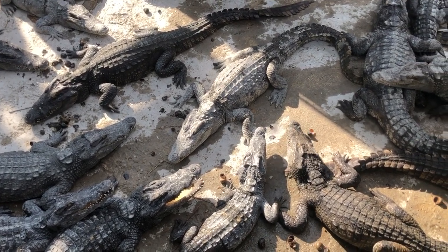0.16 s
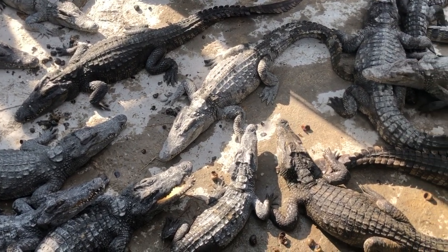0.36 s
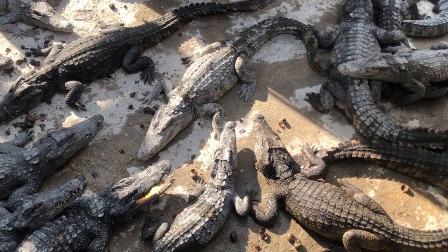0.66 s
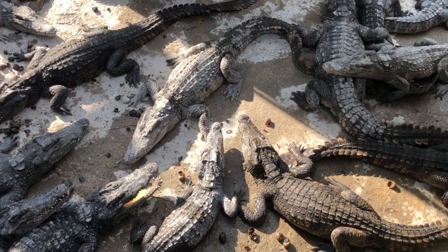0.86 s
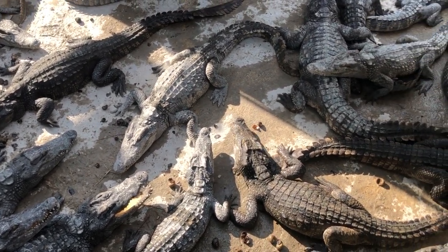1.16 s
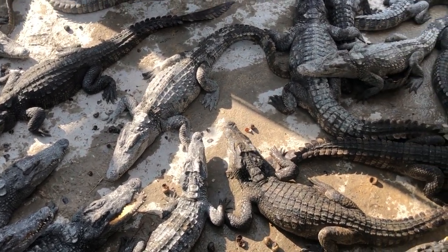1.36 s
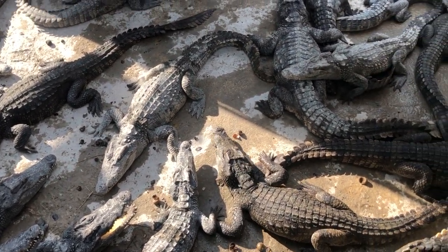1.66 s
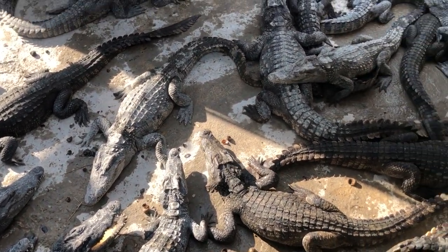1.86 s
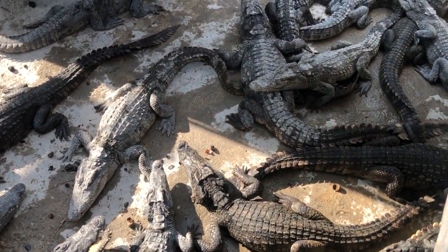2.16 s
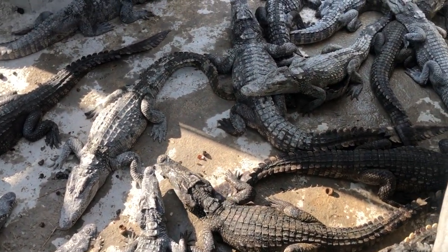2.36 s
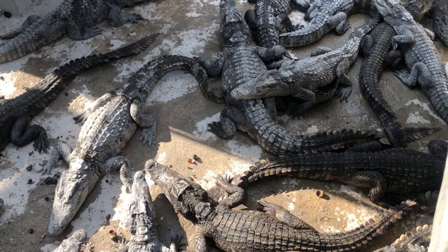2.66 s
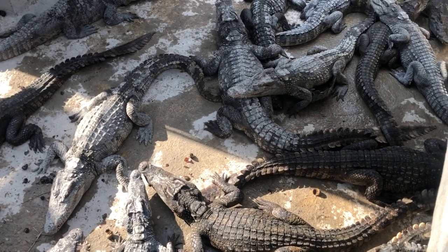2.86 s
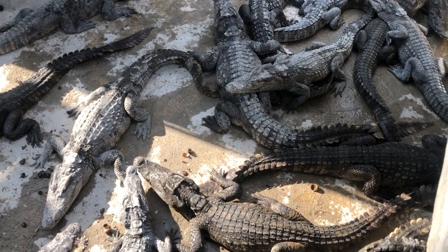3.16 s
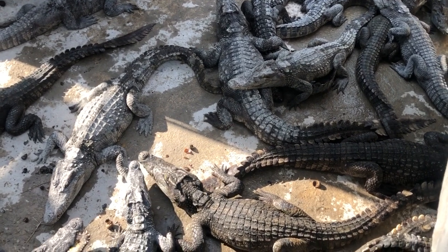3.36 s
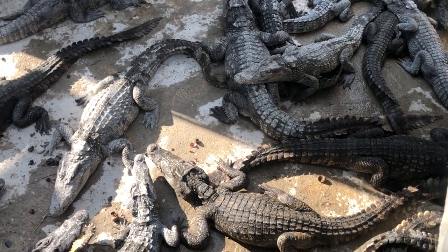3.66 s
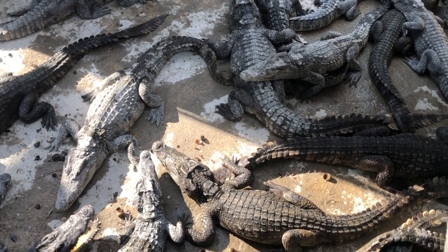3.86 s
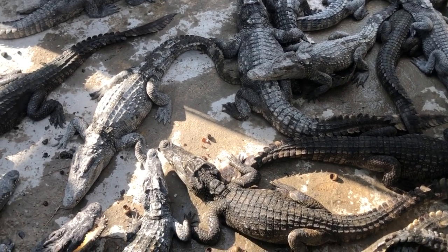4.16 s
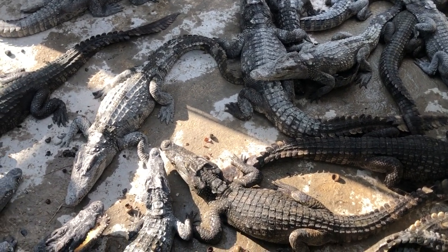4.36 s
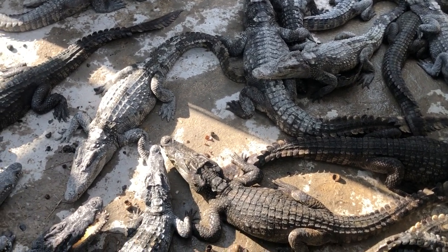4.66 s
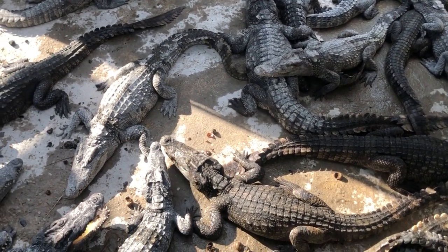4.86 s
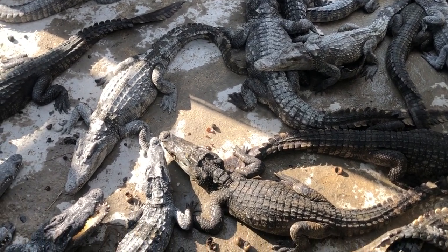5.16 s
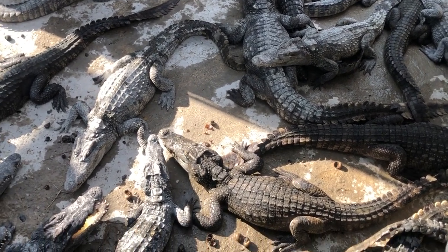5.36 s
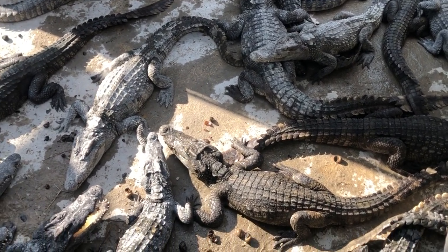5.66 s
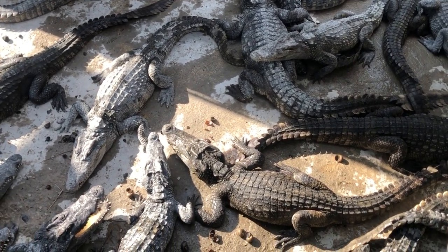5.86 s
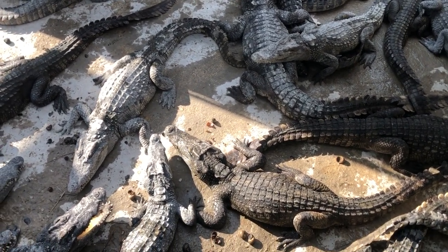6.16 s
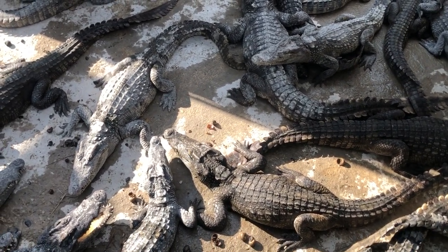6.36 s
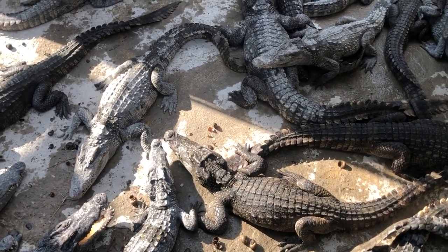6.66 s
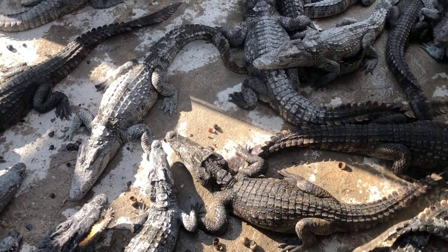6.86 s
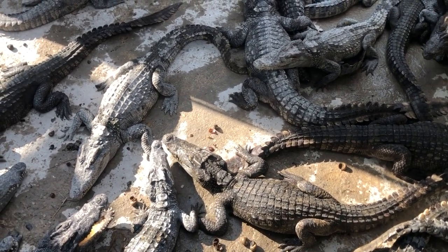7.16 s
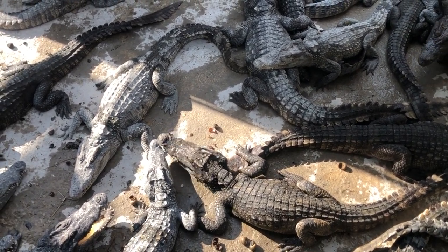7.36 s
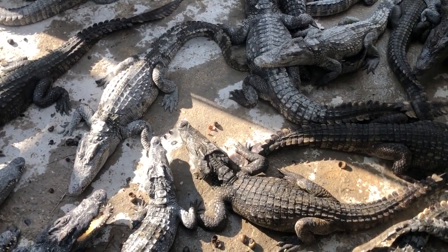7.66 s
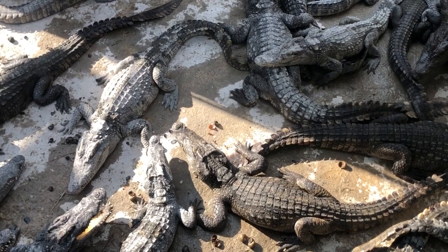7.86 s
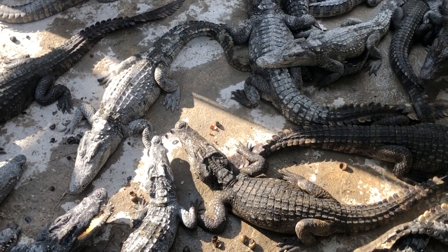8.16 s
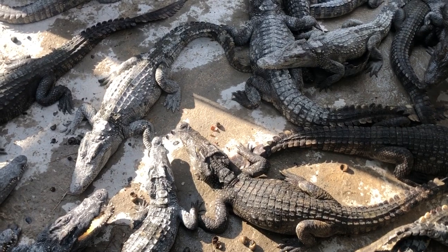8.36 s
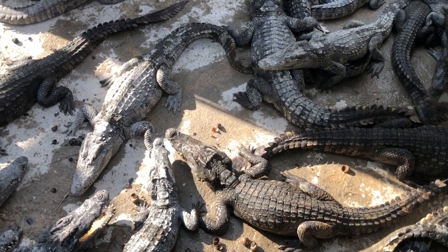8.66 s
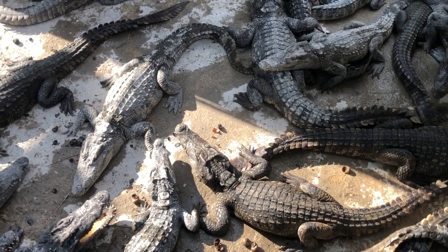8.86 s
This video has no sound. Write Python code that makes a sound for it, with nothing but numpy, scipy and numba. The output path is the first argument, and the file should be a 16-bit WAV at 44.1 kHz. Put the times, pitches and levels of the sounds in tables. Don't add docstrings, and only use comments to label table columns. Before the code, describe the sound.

Crocodiles in a concrete pen crack snail shells in sharp brittle bursts, with one loud hollow jaw knock and faint scraping between.

```python
import sys
import numpy as np
from scipy import signal
from scipy.fft import rfft, irfft
from scipy.io import wavfile
from scipy.ndimage import uniform_filter1d
from numba import njit

SR = 44100
rng = np.random.default_rng(int(sys.argv[2]) if len(sys.argv) > 2 else 0)


def voltage_ratio(decibels):
    exponent = np.asarray(decibels, float) / 20
    return 10 ** exponent


def output_pcm(signal):
    pcm = np.clip(np.atleast_2d(signal).T, -1, 1) * 32767
    wavfile.write(sys.argv[1], SR, np.round(pcm).astype(np.int16))


N = 397341
TIME = np.arange(N) / SR
NEAR_WALL_DB = -18.5

# time in seconds, level in dB, shell resonance in Hz,
# treble in dB, treble resonance in Hz.
GRIND_STROKES = [
    [(0.42, -70, 2330, -7, 10600), (0.55, -66, 2610, -11, 9530), (0.648, -76, 2560, -17, 8800),
     (0.7, -55, 2390, 1, 10400)],
    [(1.47, -50, 3000, -0.5, 12900), (1.5, -56, 3000, -4, 12000), (1.512, -48, 3300, -12, 12000),
     (1.54, -52, 3000, -8, 12000), (1.57, -48, 2970, -12, 11300), (1.63, -57, 2800, -6, 13500),
     (1.69, -60, 2950, 11, 14100), (1.715, -62, 2800, 0, 14300), (1.9, -71, 1790, -14, 9900)],
    [(6.32, -76, 1820, -11, 8600), (6.36, -54.5, 1540, 0, 8300), (6.405, -52, 1580, 0, 8400),
     (6.425, -66, 1650, 2, 8300), (6.45, -55, 1650, 0, 8300), (6.58, -68, 2000, -3, 8500),
     (6.605, -48, 2150, -12, 8300), (6.73, -66, 2100, -10, 8300)],
]


def rms1(x):
    return x / np.sqrt(np.mean(x ** 2) + 1e-30)


def colour(x, points):
    hz, db = np.transpose(points)
    log_hz = np.log(np.fft.rfftfreq(len(x), 1 / SR) + 1)
    gain_db = np.interp(log_hz, np.log(hz), db, db[0] - 29, db[-1])
    return irfft(rfft(x) * voltage_ratio(gain_db), len(x))


def ring(x, hz, width_hz):
    b, a = signal.iirpeak(min(hz, .45 * SR), hz / width_hz, fs=SR)
    return signal.lfilter(b, a, x)


def walk(rate):
    hold = int(SR / rate)
    steps = np.repeat(rng.standard_normal(N // hold + 1), hold)
    return 1.62 * uniform_filter1d(steps, hold)[:N]


def fractures(size, spread_db):
    impulses = rng.standard_normal(size)
    strength = np.minimum(rng.exponential(size=size), 4.5)
    return rms1(impulses * voltage_ratio(spread_db * strength))


def add(track, s, sound):
    i = int(s * SR)
    track[i:i + len(sound)] += sound[:max(N - i, 0)]


@njit
def glide(x, hz, share):
    y, band, low = np.empty(len(x)), 0., 0.
    for i in range(len(x)):
        g = np.tan(np.pi * hz[i] / SR)
        v = (band + g * (x[i] - low)) / (1 + g * (g + share))
        band, low, y[i] = 2 * v - band, low + 2 * g * v, share * v
    return y


def bites():
    direct, sent = np.zeros(N), np.zeros(N)
    t = np.arange(4096) / SR
    pulse = 1. * (np.arange(len(t)) == 128)
    for s, db, ms, hz, brittle_db, wall_db in breaks():
        length = max(ms - 1.6, .3) / 1000
        push = (1 - np.exp(-t / (0.18 * length))) * np.exp(-.7 * (t / length) ** (1.17 + ms / 16))
        push += voltage_ratio(-15) * (1 - np.exp(-t / length)) * np.exp(-t / 0.015)
        clumps = rng.standard_normal(64) + .8 * (np.arange(64) == 0)
        clumps = uniform_filter1d(np.repeat(clumps, 64), size=32)
        cracks = fractures(len(t), spread_db=4.0 / (1 + ms / 8)) * voltage_ratio(5 * clumps / (1 + ms / 10))
        shell = [(700, -27), (1100, -4.5), (2800, -1.5), (9000, brittle_db), (16000, brittle_db - 2.0)]
        scale = voltage_ratio(1.5) / np.std(colour(cracks, shell))
        width_hz = 0.15 * hz * (1 + ms / 40)
        chip_db = -3.0 + 0.67 * np.log2(hz / 3000) - 0.16 * ms + 0.13 * (wall_db - NEAR_WALL_DB)
        chip = voltage_ratio(chip_db) * np.sqrt(SR / np.pi / width_hz)
        energy = np.linalg.norm(push)
        cracks *= energy / np.linalg.norm(cracks * push)
        bare = colour(cracks * push, shell)
        bare *= energy / np.linalg.norm(bare)
        ringing = chip * ring(cracks * push, hz, width_hz)
        bite = held_shell(bare, s) + ringing
        add(direct, s, voltage_ratio(db) * bite)
        bite = bite - 0.31 * ringing
        if ms < 12:
            snap = scale * held_shell(colour(pulse, shell), s)
            bite = energy * (snap + voltage_ratio(-6) * chip * ring(pulse, hz, width_hz))
        add(sent, s, voltage_ratio(db + wall_db) * bite)
    return direct, sent


def breaks():
    # start in seconds, level in dB,
    # shell resonance in Hz, brittleness (treble minus low) in dB.
    gnaws = [(1.551, -35, 2960, -2), (1.6295, -38, 2920, 2), (1.7091, -41, 14000, -1),
             (1.729, -32, 14850, -9), (1.7475, -32.5, 3670, 0), (1.762, -34, 12970, -15),
             (1.772, -36, 4220, -2), (1.786, -40, 5470, -6), (1.795, -52, 4000, -10),
             (1.8015, -42, 1730, -24), (1.8195, -44, 4000, -20), (1.8282, -33.5, 1750, -8),
             (1.874, -46, 10500, 10), (1.8937, -52, 2120, -6), (1.9017, -44, 2620, -7),
             (1.93, -31, 14500, 12), (6.2967, -61, 4500, -10), (6.3401, -47, 2380, -11),
             (6.4922, -36, 1100, -5), (6.5162, -37, 8550, 3), (6.5342, -39, 8370, -4),
             (6.5417, -32, 8600, -14), (6.5499, -33, 8450, 2), (6.557, -38, 8700, -7),
             (6.5898, -33, 8600, -8), (6.725, -51.5, 8550, 3)]
    # start in seconds, level in dB, shell resonance in Hz,
    # brittleness in dB.
    near_cracks = [(0.0504, -43, 15410, 15), (0.1122, -53, 3010, -26), (0.201, -55, 5060, -4),
                   (0.3966, -52, 3400, -18), (1.3474, -53, 4010, -19), (2.0699, -50, 4700, -17),
                   (2.0812, -35, 1460, -14), (2.1165, -45, 13400, 18), (2.325, -36.5, 2300, -3),
                   (2.3804, -39.5, 2800, 0), (2.5265, -37.5, 12220, 5), (3.4487, -57, 12960, 12),
                   (3.4724, -47, 1130, -2), (3.521, -38, 5270, -3), (3.6607, -48, 7550, -5),
                   (3.699, -44, 1240, 6), (3.8608, -35.5, 4600, -3), (4.1035, -47, 2980, -23),
                   (4.183, -47.5, 4300, -22), (4.2154, -51, 2920, -20), (4.2724, -40.5, 5300, -10),
                   (4.3047, -47, 14400, -12), (4.3127, -42, 11100, 13), (8.2885, -49, 4970, -16),
                   (8.9703, -47, 5350, 8)]
    # [s, dB, Hz, dB].
    far_cracks = [(0.1212, -47.5, 5210, -9), (0.1502, -49.5, 4860, -9), (0.2225, -54.5, 5670, 10),
                  (1.3546, -45.5, 3930, -12), (2.2845, -44, 11900, -14), (2.5856, -45, 1900, -6),
                  (2.5904, -43.5, 2220, -2), (2.669, -48, 5740, -11), (4.5671, -49, 2380, -7),
                  (5.135, -47, 11500, 5), (6.0946, -52, 6400, -8), (6.2162, -54.5, 3910, -8),
                  (8.363, -48, 2090, -22), (8.578, -49, 4600, -10)]
    # start in seconds, level in dB, length in ms,
    # resonance in Hz, brittleness in dB.
    snaps = [(1.229, -53.5, 27, 7300, 0), (1.467, -36.5, 12, 12500, -1), (1.572, -38.5, 8.6, 2940, 8),
             (1.643, -41.5, 11, 5500, -3), (1.667, -48, 30, 13900, 16), (1.693, -39, 6.6, 14300, -1),
             (1.912, -24, 4.7, 8100, -4.5), (1.921, -34.5, 6.7, 12100, 7), (3.5546, -45, 9.4, 5630, -9),
             (3.7131, -17, 4.8, 2200, -8), (3.722, -29, 7.5, 10300, -2), (6.3248, -51.5, 14, 1250, -7),
             (6.361, -45, 8.1, 1640, -5), (6.3788, -46, 13, 1470, -3), (6.4657, -42, 12, 8040, -4),
             (6.5004, -40, 9, 8500, -13), (6.5986, -20.5, 3.9, 7800, -9), (8.338, -52.5, 15, 4230, 1)]
    # [s, dB, ms, Hz, dB].
    crushes = [(0.011, -51, 11.5, 2590, -16), (1.139, -55, 35, 3000, -10), (1.507, -47, 15, 3600, 0),
               (2.3022, -45.5, 28, 3640, -6), (2.3207, -39, 8.5, 4760, -14), (3.1546, -40, 28, 5540, -3),
               (3.2812, -39.5, 26, 4550, 2.5), (3.5758, -49, 14, 5640, -5), (3.609, -51, 19, 8500, -13.5),
               (3.9031, -37, 17, 3100, -3), (4.855, -46.5, 33, 3730, 2.5), (5.111, -53, 24, 4650, -5),
               (5.1895, -28.5, 34, 5740, -11), (6.395, -46, 9.1, 8000, -1), (6.4373, -43.5, 11.5, 8200, -4),
               (7.4314, -59, 33, 14980, 9), (8.012, -50, 20, 2500, -11), (8.8755, -54, 18, 13910, -6)]
    # [s, dB, ms, Hz, dB].
    far_crushes = [(0.2964, -59.5, 14, 1170, -17), (0.429, -55, 13.3, 2330, -8),
                   (0.5279, -48, 12, 2700, -7), (0.706, -55, 16, 3020, -24), (0.7972, -48, 15, 4100, -8),
                   (.843, -49, 7.3, 4700, -15), (2.237, -57, 12, 6230, -12), (2.488, -52, 10, 960, -13),
                   (3.0797, -46, 13.7, 12800, -4.5), (4.692, -65.5, 58, 6940, -2),
                   (4.817, -59, 16, 13000, -2), (5.177, -43, 27, 8900, -11), (5.47, -65.5, 49, 14000, 7),
                   (7.2346, -63, 12, 970, 0), (7.5481, -61, 16, 895, 6), (7.73, -59.5, 19, 9700, 4),
                   (8.4616, -57, 11.4, 1560, -3), (8.4879, -51.5, 8.9, 1260, -6),
                   (8.625, -58, 7.4, 8950, -15)]
    mid_wall_db, far_wall_db, edge_wall_db = -11, -6.5, -3.5
    gnaw_ms, crack_ms, far_crack_ms = 2.83, 3.87, 3.07
    quick = [(gnaws, gnaw_ms, NEAR_WALL_DB), (near_cracks, crack_ms, NEAR_WALL_DB),
             (far_cracks, far_crack_ms, far_wall_db)]
    slow = [(snaps, NEAR_WALL_DB), (crushes, mid_wall_db), (far_crushes, edge_wall_db)]
    return ([(s, db, ms, hz, brittle, wall) for rows, ms, wall in quick for s, db, hz, brittle in rows]
            + [(*row, wall) for rows, wall in slow for row in rows])


def held_shell(x, s):
    # frequency in Hz, gain in dB.
    mouths = [
        [(1500, 2.5), (3000, 0), (4200, -0.5), (5800, 4.5), (8800, -5), (10500, -6), (14000, 3), (16000, 5)],
        [(1600, 3.5), (2400, 0), (4500, -2), (6000, 0), (7000, 2), (8500, 3), (10200, -7), (16000, -2)],
    ]
    for stroke, mouth in zip(GRIND_STROKES[1:], mouths):
        when, _, hz, _, treble_hz = np.transpose(stroke)
        if when[0] - .01 < s < when[-1] + .02:
            low, high = np.interp(s, when, hz), np.interp(s, when, treble_hz)
            x = colour(x, mouth)
            low_ring = voltage_ratio(-6.5) * ring(x, low, 0.17 * low)
            high_ring = voltage_ratio(-8.0) * ring(x, high, 0.095 * high)
            return voltage_ratio(-3.0) * x + low_ring + high_ring
    return x


def ticks():
    # peak
    # time in seconds, peak in dB, pitch in Hz.
    chip_ticks = [(1.4728, -28, 5800), (1.4756, -28, 14300), (1.4873, -35, 11500), (1.4925, -35, 11500),
                  (1.5246, -41, 3200), (1.5356, -41, 4400), (1.5551, -35, 3300), (1.5638, -43, 3600),
                  (1.5767, -28, 11000), (1.5882, -38, 3000), (1.6112, -39, 2500), (1.6506, -37, 4300),
                  (1.6546, -30, 14000), (1.676, -33, 13500), (1.6816, -35, 13900), (1.6975, -33, 13900),
                  (1.7024, -35, 14000), (1.7095, -25, 14000), (1.7134, -31, 13300), (1.7174, -39, 4100),
                  (1.7213, -36, 6000), (1.7404, -34, 5400), (1.7531, -39, 3900), (1.7631, -29, 4000),
                  (1.7955, -36, 4500), (1.803, -33.5, 1800), (1.823, -42, 2100), (1.8353, -38, 9000),
                  (1.8495, -36, 3700), (1.9194, -22, 12100), (1.9244, -27, 11500), (1.9414, -35, 8800),
                  (6.387, -44, 1700), (6.404, -41, 8400), (6.448, -39, 1800), (6.4552, -40, 8100),
                  (6.475, -37, 7400), (6.5039, -36, 8400), (6.5171, -30, 8800), (6.5255, -42, 8000),
                  (6.5507, -29, 8600), (6.5773, -43, 8900), (6.5862, -33, 8500), (6.5917, -28, 8500),
                  (6.6083, -22, 8000), (6.6295, -36, 5700), (6.654, -39, 7100),
                  (.8608, -43, 2000), (1.158, -47, 3700), (2.0703, -37, 3900), (2.1154, -26, 13400),
                 (2.239, -43, 3600), (2.2527, -45, 5400), (2.3345, -22, 11700), (2.3456, -44, 3100),
                 (2.4973, -51, 4900), (2.5273, -28, 11960), (2.6115, -41, 2300), (2.727, -43, 6000),
                 (3.0753, -41, 2000), (3.0979, -30, 10700), (3.1583, -29, 5620), (3.174, -33, 5200),
                 (3.2994, -28, 4600), (3.5238, -31.5, 5100), (3.5913, -37, 8600), (3.6203, -42, 6200),
                 (3.9373, -39, 5400), (3.9535, -41, 5100), (4.889, -42, 4200), (5.178, -42, 4600),
                 (5.198, -22, 3000), (5.2084, -24, 2600), (5.2185, -24, 2500), (5.2156, -20, 6700),
                 (5.2426, -25, 5000), (8.3452, -43, 10800), (8.8786, -46, 13600), (9.002, -43, 4000)]
    width, bare_db = .3, -7
    out = np.zeros(N)
    pulse = 1. * (np.arange(512) == 64)
    bare = colour(pulse, [(1200, 0), (16000, 0)])
    for s, db, hz in chip_ticks:
        body = ring(ring(pulse, hz, width * hz), hz, 2 * width * hz)
        body = body / np.abs(body).max() + voltage_ratio(bare_db) * bare
        peak_s = np.abs(body).argmax() / SR
        add(out, s - peak_s, voltage_ratio(db) * body / np.abs(body).max())
    return out


def grind():
    # time in seconds, level in dB,
    # lower band in Hz, upper level in dB, upper band in Hz.
    rasps = [
        [(7.72, -74, 2500, 5, 3150), (7.76, -55, 2450, 1, 3200), (7.85, -63, 2250, 1, 3200),
         (8.0, -76, 2310, 0, 3300)],
        [(8.0, -61, 2400, 1, 2580), (8.04, -55, 2120, -3, 2600), (8.09, -61, 2150, 3, 2700),
         (8.16, -61, 2250, 0, 2550), (8.24, -65, 2090, 0, 2600), (8.29, -64, 2060, 3, 2550)],
        [(0.428, -57, 2350, -8, 6200), (0.5, -66, 2500, -8, 6500)],
        [(0.528, -55, 2650, -10, 4000), (0.63, -66, 2700, -10, 4000)],
        [(0.798, -55, 4150, -6, 4500), (0.93, -68, 4200, -3, 4600)],
        [(3.899, -46, 1450, -10, 2800), (3.93, -53, 1500, -8, 2800), (4.1, -68, 1500, -8, 2700)],
        [(4.47, -68, 3000, -3, 3600), (4.56, -73, 3000, -3, 3600)],
        [(4.858, -58, 3400, -1, 4200), (4.96, -68, 3500, 0, 4200)],
    ]
    jerks = fractures(N, spread_db=3.0) * voltage_ratio(3.5 * walk(120))
    scales = fractures(N, spread_db=3.5) * voltage_ratio(1.2 * walk(50))
    return strokes(GRIND_STROKES, jerks, 0.32) + strokes(rasps, scales, 0.12)


def strokes(table, cracks, share):
    out = np.zeros(N)
    for stroke in table:
        s, *columns = np.transpose(stroke)
        span = slice(int(s[0] * SR), int(s[-1] * SR))
        db, low, upper_db, high = (np.interp(TIME[span], s, c) for c in columns)
        tone, upper = (rms1(glide(glide(cracks[span], c, 2 * share), c, share)) for c in (low, high))
        add(out, s[0], voltage_ratio(db) * (tone + voltage_ratio(upper_db) * upper))
    return out


def thumps():
    # start in seconds, peak in dB, pitch in Hz,
    # ring time in ms, wall share in dB.
    knocks = [(1.9125, -25.5, 1250, 1.8, -13), (3.06, -33, 1160, 2.6, -13),
              (3.7135, -10.5, 1230, 2.8, -45.5), (3.716, -19, 440, 2, -12), (3.7283, -9.5, 507, 2.8, -13),
              (3.7268, -15, 760, 3.6, -5), (3.7148, -25, 1850, 2.7, -20), (3.7268, -17.5, 1530, 3.1, -32),
              (3.727, -25, 220, 7, -18), (3.7375, -21, 690, 4, -10), (3.772, -27, 610, 4, -12),
              (3.796, -30, 640, 4, -14), (3.818, -36, 444, 6, -16), (3.7575, -20, 556, 3.6, -10),
              (3.749, -25, 720, 4.2, -15), (3.788, -30.5, 680, 5.2, -18), (3.8995, -36, 1400, 5, -16),
              (3.906, -35, 1520, 4.7, -16), (1.0712, -40, 480, 14, -8), (6.5985, -18.5, 1295, 1.7, -16.5),
              (6.6, -34.5, 472, 3.2, -13), (6.602, -39.5, 159, 9.5, 0), (8.855, -46.5, 490, 7, -14),
              (0.799, -40.5, 4000, 5, -3)]
    # start in seconds, peak in dB, pitch in Hz, length in ms.
    bellies = [(0.754, -40, 164, 31), (.8, -40.5, 760, 76), (1.08, -40, 360, 60), (1.09, -42, 150, 90),
               (.707, -46, 905, 45), (2.32, -39, 755, 30), (2.589, -41.5, 905, 23), (5.189, -41, 160, 17),
               (5.197, -38, 605, 29), (7.646, -55, 207, 10), (8.48, -45, 800, 200)]
    belly_wall_db = -8.5
    blows = [(*row, True) for row in knocks] + [(*row, belly_wall_db, False) for row in bellies]
    direct, sent = np.zeros(N), np.zeros(N)
    t = np.arange(16384) / SR
    for s, db, hz, ms, wall_db, hollow in blows:
        fade = np.exp(-t / (max(ms, .3) / 1000))
        rough = ring(rng.standard_normal(len(t)) * fade, 0.91 * hz, 1.3 * hz)
        rough = ring(rough, hz, 2.4 * hz)
        rough = ring(rough, hz, 2 * hz)
        body = rough / np.abs(rough).max()
        if hollow:
            mode = np.sin(2 * np.pi * hz * t) * fade * (1 - np.exp(-t * hz * 1.54))
            body = 0.3 * body + mode
        body *= voltage_ratio(db) / np.abs(body).max()
        add(direct, s, body)
        add(sent, s, body * voltage_ratio(wall_db))
    return direct, sent


def walls(x):
    # frequency in Hz, time to fall 60 dB in seconds.
    wall_t60 = [(250, 0.62), (1000, 0.44), (3500, 0.54), (9000, 0.34), (16000, 0.39)]
    t = np.arange(SR // 2) / SR
    hz, t60 = np.transpose(wall_t60)
    tail = 0
    for centre in 125 * 2 ** np.arange(0, 7.1, .5):
        band = ring(rng.standard_normal(len(t)), centre, centre / 2)
        fall_s = np.interp(np.log(centre), np.log(hz), t60)
        band = band * voltage_ratio(-60 * t / fall_s) * (1 - np.exp(-t / 0.0019))
        tail = tail + band * np.sqrt(centre * fall_s) / np.linalg.norm(band)
    return signal.fftconvolve(x, tail / np.sqrt(np.sum(tail ** 2)))[:N]


def background():
    # time in seconds, dragged hide in dB, rumble in dB.
    bodies = [(0.25, -63, -61), (0.7, -60.5, -58.5), (1.15, -60, -55.5), (1.9, -63, -55), (2.46, -59, -54),
              (3.3, -63, -55), (3.86, -57.5, -55), (4.4, -62.5, -54), (5.25, -60, -55), (6.3, -62, -55.5),
              (6.55, -59, -55), (7.1, -63, -57.5), (8.26, -60, -58.5), (9.01, -61, -58.5)]
    # frequency in Hz, level in dB per Hz.
    grit_colour = [(1180, -12), (2000, -3), (5000, 0), (8000, -4), (11000, -5.5), (16000, -6.5)]
    # frequency in Hz, level in dB per Hz.
    hide_colour = [(190, -29), (330, -7.5), (510, 0.5), (2290, -12.5), (3500, -19.5), (4550, -37),
                   (7700, -120)]
    # frequency in Hz, level in dB per Hz.
    rumble_colour = [(15, -49), (30, -7), (53, -4), (134, -1), (249, 1.5), (349, -8), (450, -13),
                     (580, -32), (990, -120)]
    # start in seconds, length in seconds, pitch in Hz, level in dB.
    chirps = [
        (0.05, 0.07, 1175, -55.5),
        (.255, 0.037, 2170, -63),
    ]
    s, *levels = np.transpose(bodies)
    hide_db, rumble_db = (np.interp(TIME, s, c) for c in levels)
    shift = walk(14)
    grit_level = voltage_ratio(scurry_db() + 0.8 * shift + 1.16 * walk(44))
    out = grit_level * rms1(colour(fractures(N, spread_db=3.5), grit_colour))
    hide_level = voltage_ratio(hide_db + 0.9 * shift + 0.67 * walk(30))
    out += hide_level * rms1(colour(rng.standard_normal(N), hide_colour))
    rumble_level = voltage_ratio(rumble_db + 0.53 * walk(9))
    out += rumble_level * rms1(colour(rng.standard_normal(N), rumble_colour))
    for start, length, hz, db in chirps:
        t = np.arange(int(length * SR)) / SR
        swell = np.sin(np.pi * t / length) ** .5
        add(out, start, voltage_ratio(db) * swell * np.sin(2 * np.pi * hz * t))
    return out


def scurry_db():
    # peak time in seconds, peak in dB, spell in seconds.
    scurries = [(0.01, -56, 0.14), (0.7, -64.5, 0.65), (1.2, -61.5, 0.68), (1.69, -49.5, 0.33),
                (2.2, -59, 0.91), (3.0, -61.5, 0.25), (3.71, -50, 0.47), (5.27, -54, 0.4),
                (5.95, -63, 0.85), (6.7, -69.5, 0.46), (7.9, -64, 1.75), (8.8, -63, 1.4),
                (9.01, -55.5, 0.38)]
    rise, drop_db, still_db = 0.46, 16, -69.5
    power = voltage_ratio(still_db) ** 2
    for s, db, spell in scurries:
        away = np.maximum(TIME - s, (s - TIME) / rise) / spell
        power = power + voltage_ratio(db - drop_db * away) ** 2
    return 10 * np.log10(power)


def scene():
    bite, bite_sent = bites()
    thump, thump_sent = thumps()
    teeth, chips = grind(), ticks()
    sent = voltage_ratio(7.0) * bite_sent + voltage_ratio(-0.5) * thump_sent + voltage_ratio(-10.0) * teeth + voltage_ratio(-11.5) * chips
    echo = walls(sent)
    return (bite + thump + teeth + chips + echo + background())[None]


def top_cut(x):
    return signal.sosfilt(signal.butter(12, 16640, fs=SR, output="sos"), x)


def record(dry):
    heard = colour(dry[0], [(20, -20.0), (45, -0.5), (15800, -1.5), (15950, -34.0), (17000, -44.0)])
    return top_cut(heard[None])


dry = scene()
out = record(dry)
output_pcm(out)
```